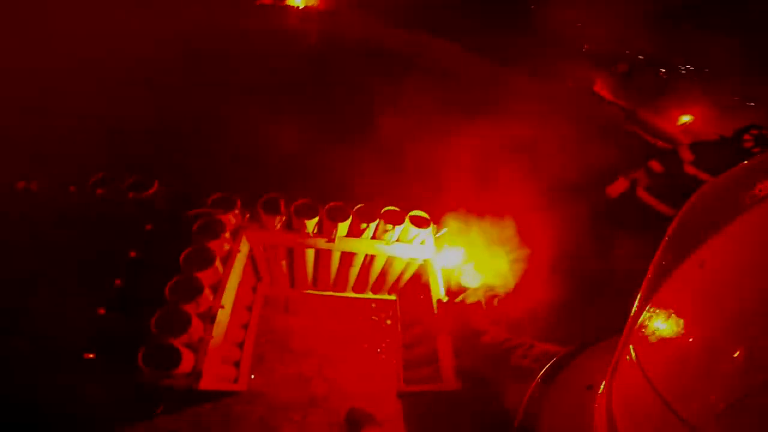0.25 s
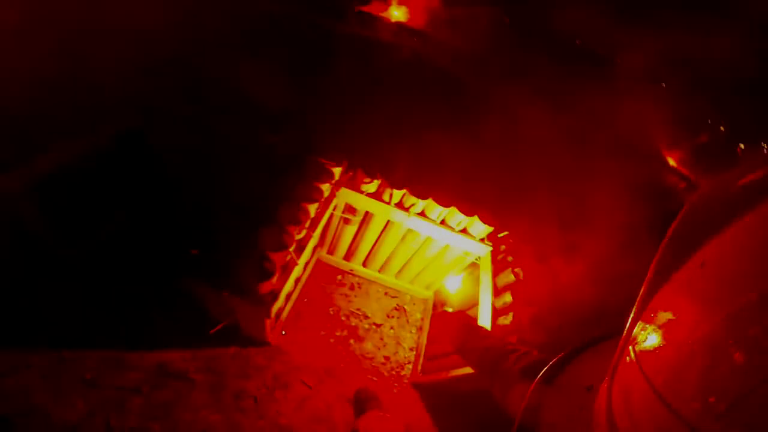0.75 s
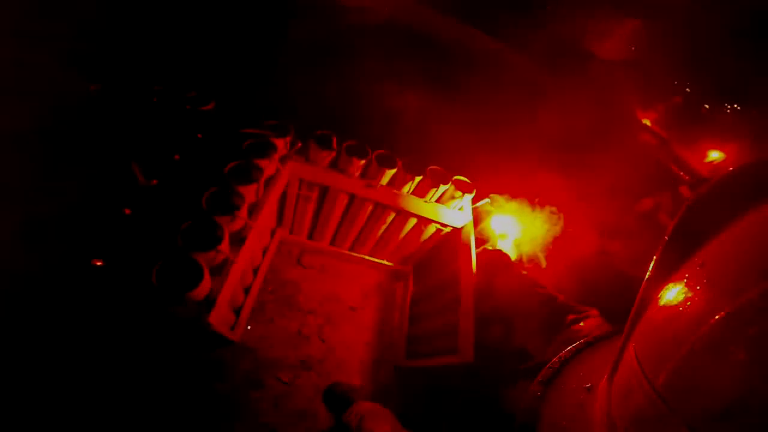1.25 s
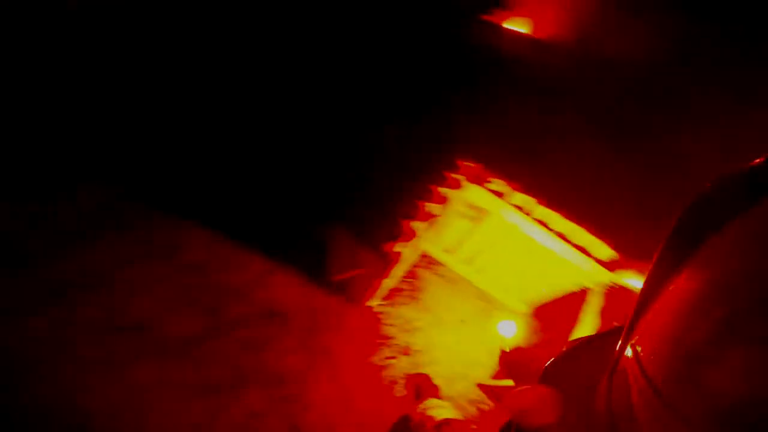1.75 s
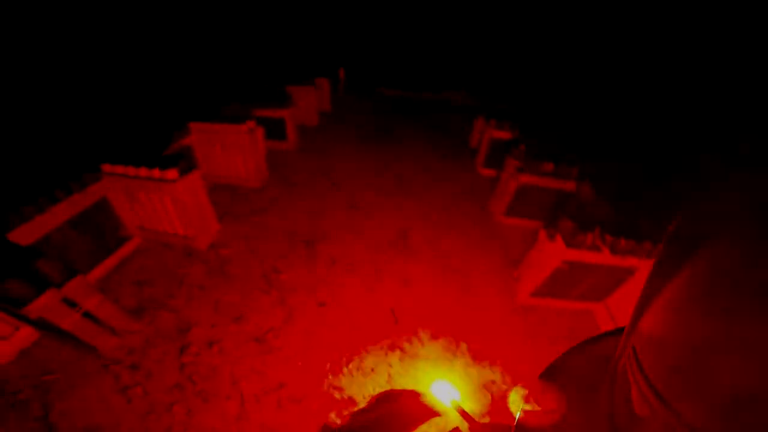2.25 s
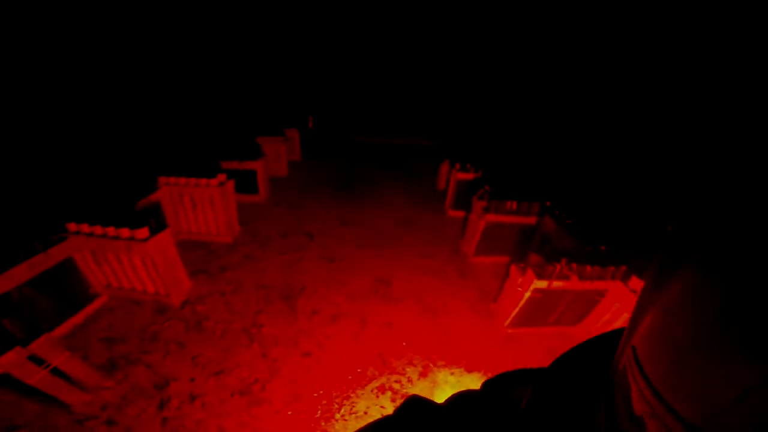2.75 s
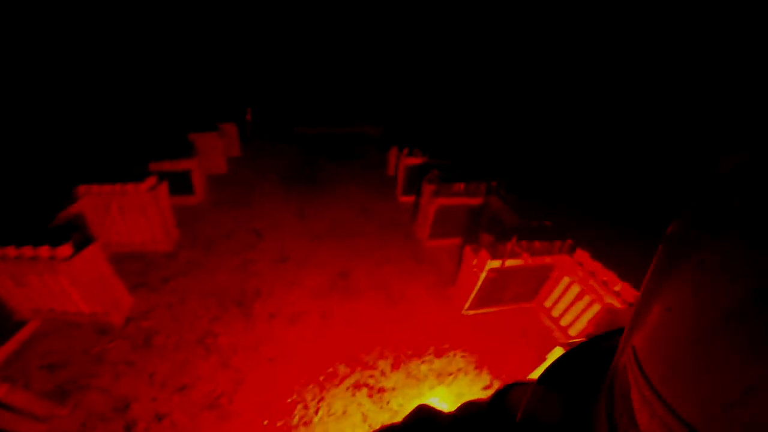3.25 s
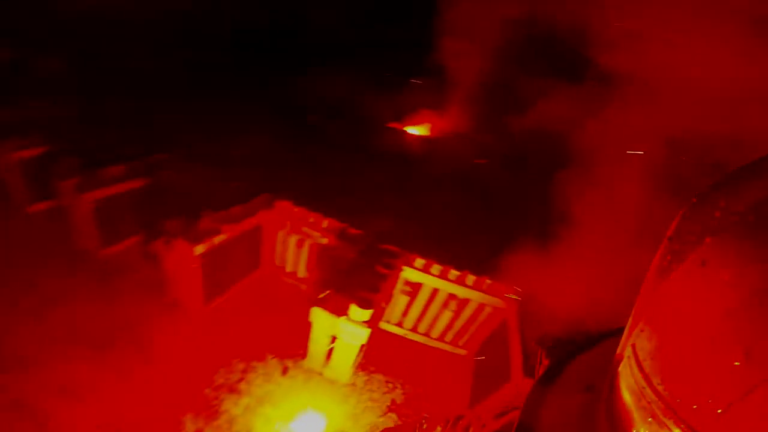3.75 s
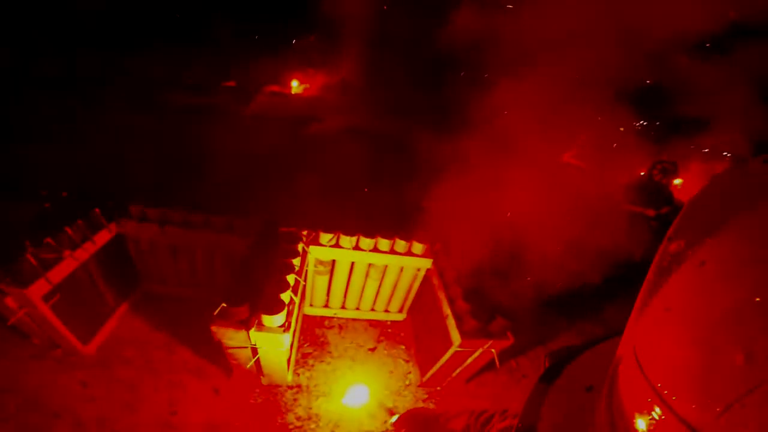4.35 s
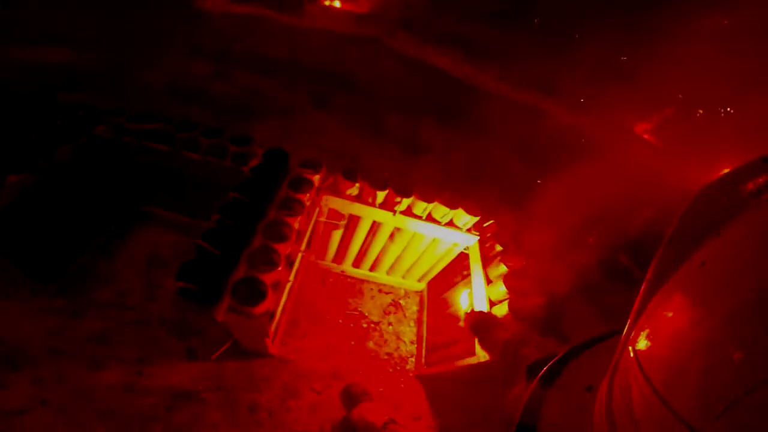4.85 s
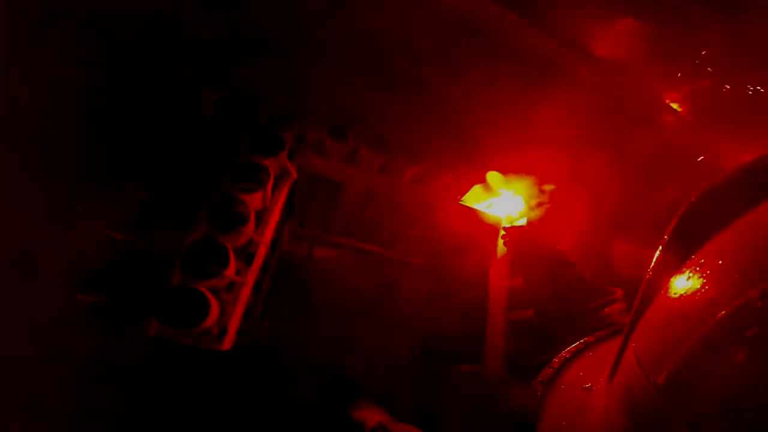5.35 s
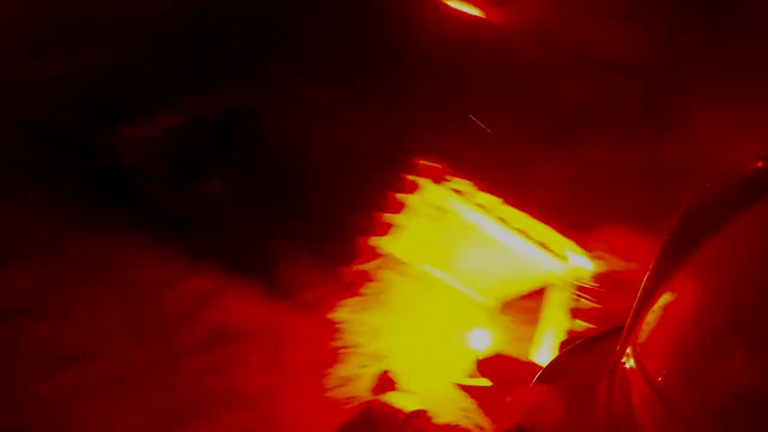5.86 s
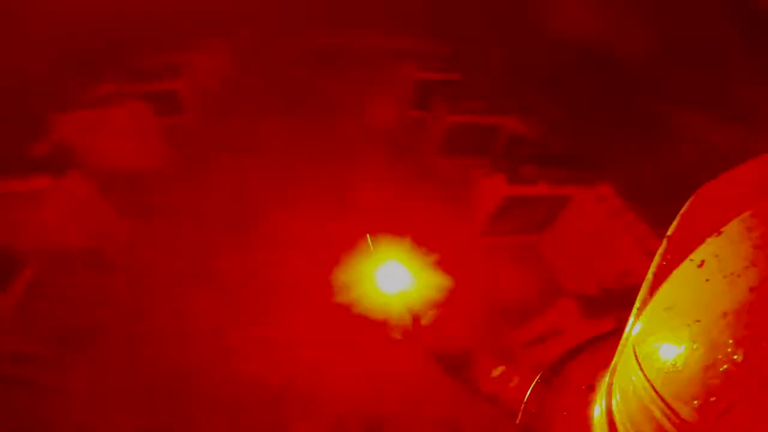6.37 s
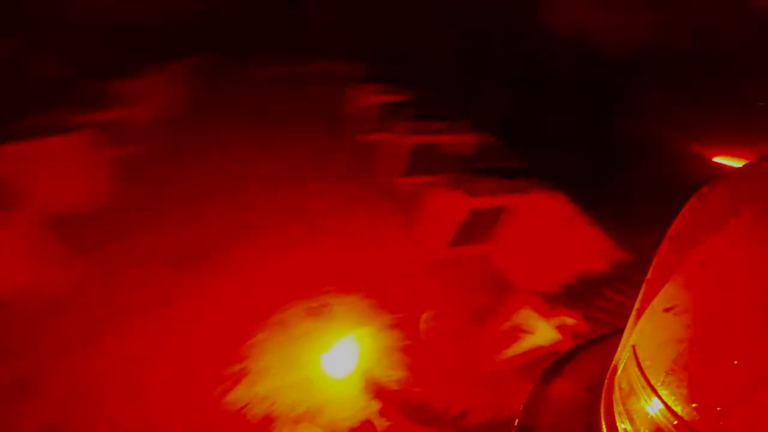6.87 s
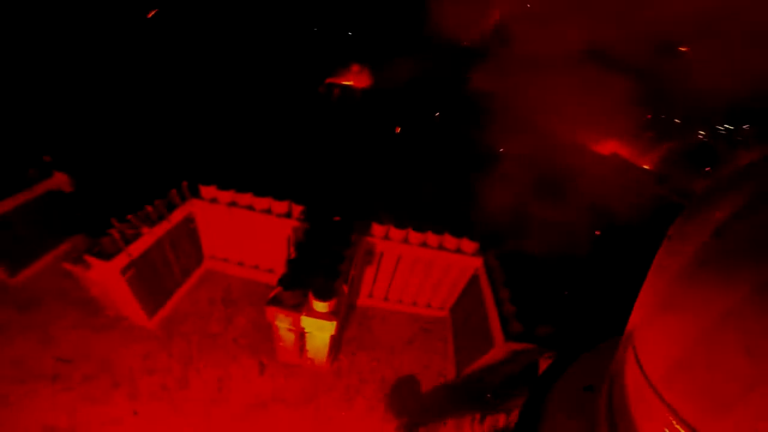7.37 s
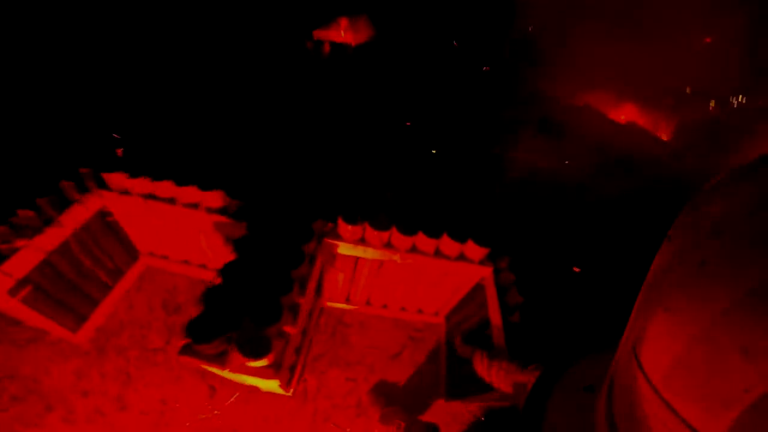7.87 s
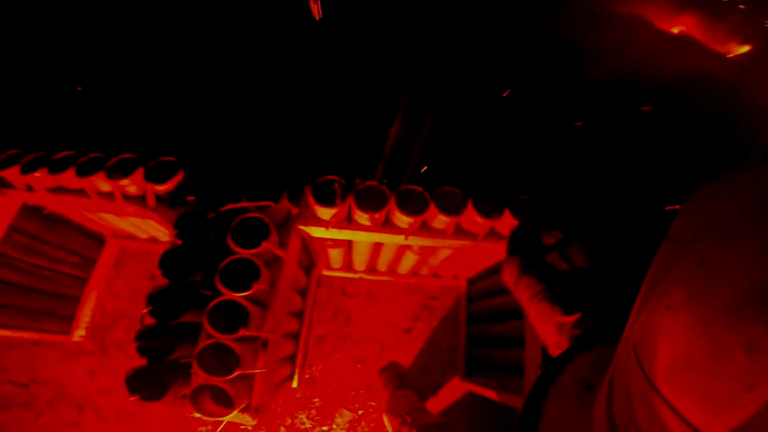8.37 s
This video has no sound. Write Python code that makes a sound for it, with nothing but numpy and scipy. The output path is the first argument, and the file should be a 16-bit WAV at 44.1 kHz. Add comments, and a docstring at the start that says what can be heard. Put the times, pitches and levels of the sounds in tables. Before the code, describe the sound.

Mortars thump and shells crack overhead while a flare hisses, then a rapid crackle of popping stars sets in.

```python
"""Fireworks at night

Shells leave mortar racks and burst overhead, heard by a small camera in a closed, resonant case.
Nearby mortar lifts send out pressure pulses (thumps) and turbulent gas (cracks); one far boom is dull.
Each burst sends a shock wave, followed by its ground reflection. Crackling stars pop as random
impulses over the hiss of a burning flare, a far rumble and wind on the case."""
import sys
import numpy as np
from scipy import signal
from scipy.io import wavfile
from scipy.ndimage import uniform_filter1d

SR = 44100
rng = np.random.default_rng(int(sys.argv[2]) if len(sys.argv) > 2 else 0)


def unload_wav(signal):
    """Save mono or channel-first audio to the path in sys.argv[1] as 16-bit WAV at rate SR, clipped to [-1, 1]."""
    wavfile.write(
        sys.argv[1],
        SR,
        np.round(np.clip(np.atleast_2d(signal).T, -1, 1) * 32767).astype(np.int16),
    )


N = 380141

# wind on the case: (time [s], level [dB])
WIND_LEVELS = [(0.0, -44), (0.14, -38.5), (0.3, -46.5), (0.81, -55), (1.44, -46), (1.75, -32),
               (2.11, -40.5), (2.45, -45.5), (2.66, -40), (3.1, -56), (3.43, -49.5), (3.6, -59.5),
               (4.13, -48.5), (4.54, -44), (4.85, -50), (5.38, -41), (5.76, -37.5), (5.91, -44.5),
               (6.67, -56.5), (7.54, -50.5), (7.77, -32.5), (7.87, -41.5), (8.03, -34), (8.31, -49),
               (8.62, -43)]
# flare and far rumble: (time [s], hiss level [dB], treble re hiss [dB], rumble level [dB])
HISS_AND_RUMBLE = [(0.0, -45.5, -5.5, -58), (0.14, -50, -12, -54), (0.4, -50, -24, -39.5),
                   (0.75, -52, -18.5, -57), (1.15, -55.5, -18, -48.5), (1.5, -49, -7, -44),
                   (1.72, -48.5, -11, -46.5), (1.94, -54, -14.5, -50.5), (2.47, -58, -13, -52.5),
                   (2.65, -56, -16, -50.5), (2.93, -55.5, -4, -56.5), (3.7, -55.5, -24, -56),
                   (4.03, -59, -14, -51), (4.27, -56, -11.5, -52.5), (4.6, -61, -10.5, -56),
                   (5.2, -48.5, -24, -51.5), (5.7, -56.5, -5, -47.5), (5.9, -57, -16, -51),
                   (6.41, -52.5, -11, -55), (6.7, -52, -19, -54.5), (7.2, -54.5, -21, -53.5),
                   (7.9, -50.5, -11, -51.5), (8.16, -48.5, -11, -57.5), (8.35, -48.5, -14, -65),
                   (8.43, -37, -12, -47), (8.62, -43, -25, -48)]
# the many small stars: (time [s], pop rate [1/s], level [dB])
SMALL_STARS = [(6.38, -2, -38), (6.45, 90, -38.5), (7.0, 88, -39), (7.4, 180, -36.5), (7.9, 211.5, -35.5),
               (8.17, 225, -32.5), (8.2, 230, -50), (8.25, 230, -34), (8.62, 253, -34)]
# the loudest stars: (time [s], peak level [dB])
LOUD_STARS = [(6.4906, -28.5), (6.5809, -27), (6.6494, -34), (6.7988, -34), (6.8345, -25), (6.8652, -20),
              (6.8796, -22.5), (6.9377, -29), (6.9893, -24.5), (7.1779, -21), (7.2329, -28), (7.2467, -37),
              (7.2824, -32), (7.3152, -16), (7.3479, -22.5), (7.4027, -20), (7.4145, -24.5), (7.452, -21),
              (7.4707, -17.5), (7.491, -27), (7.4957, -22), (7.502, -23.5), (7.528, -26), (7.536, -21.5),
              (7.5725, -27), (7.587, -24.5), (7.603, -24), (7.6107, -23), (7.6166, -21.5), (7.6436, -25),
              (7.6679, -19), (7.6828, -26), (7.7033, -19), (7.7096, -24), (7.7233, -22), (7.763, -27),
              (7.767, -20), (7.815, -23.5), (7.8366, -21), (7.861, -17.5), (7.886, -16), (7.909, -21.5),
              (7.9622, -23), (7.972, -20.5), (8.0087, -21.5), (8.036, -25), (8.048, -24), (8.0694, -20.5),
              (8.091, -23), (8.1119, -17.5), (8.1197, -18.5), (8.1551, -25.5), (8.1627, -19), (8.171, -20),
              (8.2322, -25), (8.2566, -25), (8.282, -22.5), (8.3158, -21), (8.3882, -20.5)]
# spurts of gas: (peak time [s], level [dB], rise [ms], t60 [ms], body re level [dB], treble re level [dB])
GAS_CRACKS = [(0.1568, -29, 0.91, 19, -7, -33), (0.1987, -18, 4.9, 7.8, -32, -2),
              (0.2081, -23, 6.3, 82, -19, -6), (0.2215, -33, 7, 32, -16, 3), (0.2344, -28, 5.5, 65, -20, 0),
              (0.2517, -12, 2.7, 21, -23, -4.5), (0.265, -25.5, 7, 32, -7, -14),
              (0.2789, -31, 7.9, 13, -18, -15), (0.2889, -20, 8, 14, -14, -9.5),
              (0.3538, -25.5, 6, 44, -27, 1.5), (0.3801, -4, 1.66, 14.3, -3, -11.5),
              (0.4479, -30.5, .64, 29, -9, 4), (0.4665, -25, .82, 61, -17, -15),
              (0.5285, -17, 2.7, 17, 1, -1.5), (1.0955, -28.5, 4.8, 36, -14, -3.5),
              (1.2688, -36, 2.4, 37, -4, -8), (1.3023, -17.5, 5.4, 7.1, -37, -2.5),
              (1.3523, -17.5, 3, 37, -12.5, -8.5), (1.3792, -30.5, 3.3, 20, -15, -20),
              (1.5015, -31, 0.89, 21, -10, -13), (1.5344, -13, 2.6, 26, 0, -15.5),
              (1.6644, -41, 3.2, 26, 0, -12), (1.7661, -37.5, 2.6, 60, -1.5, -23),
              (1.7863, -36.5, 8.6, 69, -16, -19), (2.1465, -27, 1.1, 13, -8, -24),
              (2.1583, -33.5, 4.5, 54, -4, -16), (2.1715, -13.5, 3, 24, -1.5, -17.5),
              (2.4821, -10.5, 0.78, 18, -30, -11.5), (2.49, -24.5, 3.3, 53, -8.5, -32),
              (2.586, -41, 2.5, 30, 4, -18), (2.6039, -29, 0.48, 92, -15, -15),
              (2.6351, -7, 1.15, 17, -3.5, -10.5), (2.6922, -39, 15, 28, -3, -8),
              (2.7629, -41, 1.9, 27, -1, -14), (2.8704, -41, 3.7, 81, -0.5, -14),
              (2.9498, -2, 0.68, 8.4, -22, -19), (2.9626, -15, 6.4, 44, -3.5, -35),
              (2.969, -22, 3, 30, -9, -25), (2.9769, -11.5, 2.5, 35, -6, -24),
              (3.011, -11.5, 1.8, 15, -4, -16), (3.0156, -11, 4, 20, 5, -15),
              (3.2562, -41.5, 13, 54, -2, -25), (4.9168, -38.5, 3.6, 23, 2, -36),
              (5.3229, -36.5, 0.44, 17, -3, -18), (5.4094, -40, .8, 13, 1, -14),
              (5.5968, -30, 5.8, 7.1, -6, -11), (5.6122, -31.5, 6, 69, -6.5, -10),
              (5.6976, -35, 1.6, 27, -5, -27), (5.7541, -31, 0.93, 44, -2, -12),
              (5.7876, -13.5, 4.1, 7.1, -6, -5.5), (5.7961, -22.5, 7.8, 51, 2, -18),
              (6.1734, -35, 2.9, 10, -14, -28), (6.1929, -29, 0.7, 16, -16, -16),
              (6.2394, -7.5, 2, 13, -25, -17.5), (6.245, -17, 2.9, 32, -1.5, -20),
              (6.2527, -10.5, 0.93, 33, -7, -18), (6.2602, -15.5, 1.5, 43, -6, -18),
              (6.2773, -25, .9, 46, -4.5, -25), (6.3112, -11, 5.2, 15, 3.5, -18),
              (6.552, -36.5, 4.4, 51, -6, -32), (8.247, -25, 2.8, 31, -14, -30),
              (8.356, -26.5, 2.1, 58, -16.5, -20), (8.4127, -18, .59, 16, -17, -12),
              (8.4276, -14, 0.89, 66, -30, -10.5), (8.4321, -18.5, 1.9, 58, -28, -5),
              (8.4367, -19, 7.2, 37, -26, -22), (8.4491, -19.5, 1.5, 47, -19, -26),
              (8.468, -24, 3.9, 50, -13, -14), (8.5109, -21, 3, 13, -33, -25),
              (8.5359, -11, 3, 13.5, -27, -17), (8.5612, -16.5, .72, 38, -10, -16),
              (8.6042, -9, 4.7, 15, -33, -5)]
# low thumps, from nearby mortar lifts and one far, dull boom at 7.75 s:
# (time [s], level [dB], positive phase [ms], rise [ms], whoosh level [dB])
LOW_THUMPS = [(0.3794, -1, 1.2, 0.8, -49), (0.5274, -5.5, 1.07, 0.24, -41), (1.5322, 2.5, 1.5, 1.2, -28),
              (2.168, -5.5, 1.73, 0.2, -41), (2.634, -4, 2.9, 2.04, -36), (2.973, -25, 1.2, 0.41, -44),
              (3.0141, -1, 1.14, 0.12, -43), (5.61, -9.5, 0.43, .5, -41), (5.785, 4.5, 0.96, 0.94, -37),
              (5.797, -6.5, 0.93, 0.2, -29), (6.309, -1, 1.1, 0.35, -39.5), (7.754, -20, 9, 4.7, -52),
              (8.603, -5, 1.8, 0.38, -35)]
# shells bursting overhead: (time [s], shock level [dB], positive phase [ms], spray level [dB],
# ground echo delay [ms], echo gain [dB], whoosh level [dB], roar level [dB])
SHELL_BURSTS = [(0.5054, -5.5, 1., -10.5, 9.4, -0.5, -37, -59),
                (3.1835, -3.5, 0.66, -14.5, 10.5, -6, -39, -52), (4.72, 1.5, 0.67, -7.5, 9.8, -3, -33, -44),
                (4.802, -2.5, 0.62, -14.5, 9.8, -3.5, -35.5, -48),
                (5.9018, 2, 0.61, -12, 9.7, -3.5, -31.5, -43)]
# reverberation from racks and ground: (frequency [Hz], t60 [s])
FIELD_DECAY = [(60, 0.23), (200, 0.36), (600, 0.19), (2500, 0.16), (7000, 0.27)]
# resonances of the case: (frequency [Hz], bandwidth [Hz], gain [dB])
CASE_MODES = [(191.4, 78, 6.5), (1225, 230, 3.5), (1531, 142, 10), (2080, 93, -15), (2694, 240, 16.5),
              (3572, 160, 10.5), (4245, 220, 6.5), (4693, 216, 11.5), (5787, 182, 13.5), (6090, 290, 10),
              (7500, 170, -3)]
# transmission through the case, which dulls the treble: (frequency [Hz], gain [dB])
CASE_TRANSMISSION = [(20, -8.5), (70, 6), (400, 1), (2000, 0), (4000, -9), (5150, -13), (7000, -13.5),
                     (11000, -22.5), (14000, -32.5), (16000, -61)]

HISS_HOLLOW_DB, HISS_BODY_DB, SIZZLE_DB = -2, -3, -12.5
STAR_T60_S, STAR_RISE_S, STAR_ECHO_S, STAR_ECHO_DB = 0.0092, 0.0004, 0.0102, -9.5
HOLLOW_SHARE, HOLLOW_DB = 0.54, 1.5  # a crack's hollow band follows its body band
WHOOSH_DELAY_S, ROAR_DELAY_S = 0.02, 0.09
FIELD_DB, CUTOFF_HZ = -14, 15170


def gain_of(db):
    """Amplitude ratio of a level in decibels."""
    return 10 ** (np.asarray(db) / 20)


def unit_rms(x):
    """Normalisation to unit mean power."""
    return x / np.sqrt(np.mean(x ** 2) + 1e-20)


def at_frequency(points, hz):
    """Interpolation along a logarithmic frequency axis."""
    knots_hz, values = np.transpose(points)
    return np.interp(np.log(hz + 1), np.log(knots_hz + 1), values)


def curves(rows):
    """Linear interpolation in time, one curve per value column."""
    times, *columns = np.transpose(rows)
    return [np.interp(np.arange(N) / SR, times, column) for column in columns]


def add(mix, s, sound):
    """Superposition of a sound on the mix, starting at s seconds."""
    part = mix[max(round(s * SR), 0):][:len(sound)]
    part += sound[:len(part)]


def band(x, lo_hz, hi_hz):
    """Causal band-pass filtering."""
    return signal.sosfilt(signal.butter(N=2, Wn=[lo_hz, hi_hz], btype="band", fs=SR, output="sos"), x)


def flutter(depth_db, samples):
    """Log-normal amplitude modulation: smoothed noise sets the level."""
    return gain_of(depth_db * unit_rms(uniform_filter1d(rng.standard_normal(N), size=samples)))


def puff(db, rise_ms, t60_ms):
    """Exponential growth, 10 dB per rise time, then decay; returns (time to peak [s], envelope)."""
    ms = np.arange(-3 * rise_ms, t60_ms, 1000 / SR)
    return 3 * rise_ms / 1000, gain_of(db + np.minimum(10 * ms / rise_ms, -60 * ms / t60_ms))


def case(x):
    """Resonance and transmission loss of the camera case, as a minimum-phase filter."""
    hz = abs(np.fft.fftfreq(8192, 1 / SR))
    resonance = 1 + sum(gain_of(2 * db) / (1 + (2 * (hz - f) / width) ** 2) for f, width, db in CASE_MODES)
    log_gain = np.log(gain_of(at_frequency(CASE_TRANSMISSION, hz)) * np.sqrt(resonance))
    phase = -signal.hilbert(log_gain).imag
    taps = np.fft.ifft(np.exp(log_gain + 1j * phase)).real[:4096]
    return signal.oaconvolve(x, taps)[:len(x)]


def noise_bands():
    """Band-limited noise (body, hollow, middle, treble), each of unit RMS once inside the case."""
    edges_hz = [(250, 1000), (800, 2200), (1800, 7500), (6300, 17000)]
    parts = [band(band(rng.standard_normal(N), *edges), *edges) for edges in edges_hz]
    return np.array([part / case(part[:SR]).std() for part in parts])


def far_rumble():
    """Amplitude-modulated low noise, heard as a distant, uneven rumble."""
    _, _, level_db = curves(HISS_AND_RUMBLE)
    noise = unit_rms(band(band(rng.standard_normal(N), 71, 241), 71, 242))
    return noise * gain_of(level_db) * flutter(depth_db=3.7, samples=1500)


def wind():
    """Turbulent pressure of wind on the case: very low noise that comes in lumps."""
    level_db, = curves(WIND_LEVELS)
    noise = unit_rms(band(band(rng.standard_normal(N), 16.8, 34.3), 12.2, 44))
    return noise * gain_of(level_db) * flutter(depth_db=3.8, samples=3000)


def flare():
    """Combustion noise: burning powder hisses and sizzles; the roar after each burst adds in power."""
    level_db, treble_db, _ = curves(HISS_AND_RUMBLE)
    power = gain_of(2 * level_db)
    for s, *_, roar_db in SHELL_BURSTS:
        lead_s, roar = puff(roar_db, rise_ms=43, t60_ms=1400)  # rolls back from the field
        add(power, s + ROAR_DELAY_S - lead_s, roar ** 2)
    body, hollow, middle, treble = noise_bands()
    sizzle = band(rng.standard_normal(N), 5700, 6400)
    sizzle = gain_of(SIZZLE_DB) * sizzle / case(sizzle[:SR]).std()
    bright = middle + sizzle + gain_of(treble_db) * treble
    dark = gain_of(HISS_HOLLOW_DB) * (hollow + gain_of(HISS_BODY_DB) * body)
    return flutter(depth_db=1.17, samples=500) * np.sqrt(power) * (bright + dark)


def field_echoes(x):
    """Reverberation: sparse reflections of random sign, each band decaying at its own rate."""
    taps = np.zeros(SR)
    slots = np.arange(200, SR - 20, 20)
    taps[slots + rng.integers(0, 20, len(slots))] = rng.choice([-1., 1.], len(slots))
    hz, t, spectrum = signal.stft(taps, SR, nperseg=256)
    decay = gain_of(-60 * t / at_frequency(FIELD_DECAY, hz)[:, None])
    _, tail = signal.istft(spectrum * decay, SR, nperseg=256)
    return signal.fftconvolve(x, tail / np.linalg.norm(tail))[:N]


def stars():
    """Shot noise: each star is a tiny sharp pop with little bass, reflected once by the ground."""
    rate, level_db = curves(SMALL_STARS)
    chance, size, timbre = rng.random((3, N))
    impulses = (chance < rate / SR) * gain_of(level_db - 2.6 * np.log(size + 0.074))
    for s, db in LOUD_STARS:
        add(impulses, s, gain_of([db]))
    t = np.arange(0, 0.015, 1 / SR)
    envelope = gain_of(-60 * t / STAR_T60_S) * np.minimum(t / STAR_RISE_S, 1)
    direct, echo = np.zeros((2, N))
    for k in range(24):  # each star takes one of 24 waveforms
        pop = band(band(rng.standard_normal(len(t)) * envelope, 3060, 18000), 710, 22000)
        chosen = (timbre * 24).astype(int) == k
        direct += signal.oaconvolve(impulses * chosen, pop / abs(case(pop)).max())[:N]
    add(echo, STAR_ECHO_S, gain_of(STAR_ECHO_DB) * band(direct, 2200, 9800))
    return direct + echo


def cracks():
    """Turbulent gas: cracks, burst sprays and whooshes are gritty, incoherent noise, so powers add."""
    spurts = list(GAS_CRACKS)
    for s, _, _, spray_db, delay_ms, echo_db, _, _ in SHELL_BURSTS:  # the spray, then its ground echo
        spurts.append((s + 0.0003, spray_db, 0.12, 13, -14, -14))
        spurts.append((s + 0.00034 + delay_ms / 1000, spray_db + echo_db, 0.2, 16, -12, -15))
    whooshes = [(s, db) for s, *_, db, _ in SHELL_BURSTS] + [(s, db) for s, *_, db in LOW_THUMPS]
    for s, db in whooshes:  # gas rushes on after each burst and thump
        spurts.append((s + WHOOSH_DELAY_S, db, 4, 162, -9.5, -11))
    powers = np.zeros((4, N))
    for s, db, rise_ms, t60_ms, body_db, treble_db in spurts:
        lead_s, envelope = puff(db, rise_ms, t60_ms)
        hollow_db = HOLLOW_SHARE * body_db + HOLLOW_DB
        for power, band_db in zip(powers, (body_db, hollow_db, 0, treble_db)):
            add(power, s - lead_s, gain_of(2 * band_db) * envelope ** 2)
    grit = unit_rms(flutter(depth_db=4, samples=12))
    return (np.sqrt(powers) * noise_bands()).sum(0) * grit


def shock(db, positive_ms, rise_ms):
    """Blast wave: a jump of pressure, its fall and a weaker suction; the microphone inverts it."""
    ms = np.arange(4000) / SR * 1000
    return -gain_of(db) * (1 - ms / positive_ms) * np.exp(-ms / positive_ms) * (1 - np.exp(-ms / rise_ms))


def blasts():
    """Sudden gas expansion: shells radiate shocks with a ground echo; low thumps are slower pulses."""
    pressure = np.zeros(N)
    for s, db, positive_ms, _, delay_ms, echo_db, _, _ in SHELL_BURSTS:
        direct = shock(db, positive_ms, 0.037) + shock(db + 10.5, 0.045, 0.012)  # steep front rings the case
        echo = shock(db + echo_db, positive_ms, 0.071) + shock(db + echo_db + 14, 0.1, 0.0099)
        add(pressure, s, direct)
        add(pressure, s + delay_ms / 1000, echo)
    for s, db, positive_ms, rise_ms, _ in LOW_THUMPS:
        add(pressure, s, shock(db, positive_ms, rise_ms) + shock(db - 19.5, 2.4, 2.9))
    return pressure


def scene():
    """Superposition: shots, echoes and flare pass through the case; rumble and wind add directly."""
    shots = cracks() + blasts() + stars()
    outside = shots + gain_of(FIELD_DB) * field_echoes(shots) + flare()
    return (case(outside) + far_rumble() + wind())[None]


def record(dry):
    """Saturation: the input adds faint hiss and clips the loudest blasts; a low-pass limits the band."""
    self_noise = gain_of(-87) * band(rng.standard_normal(N), 5000, 12060)
    clipped = np.clip(dry + self_noise, -0.95, 0.95)
    low_pass = signal.firwin(511, CUTOFF_HZ, window=("kaiser", 9), fs=SR)
    return signal.oaconvolve(clipped, low_pass[None], "same")


dry = scene()
out = record(dry)
unload_wav(out)
```